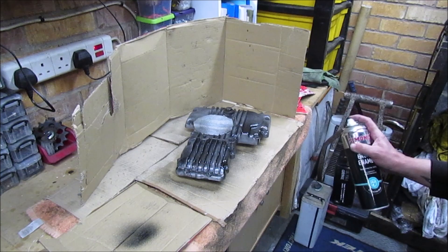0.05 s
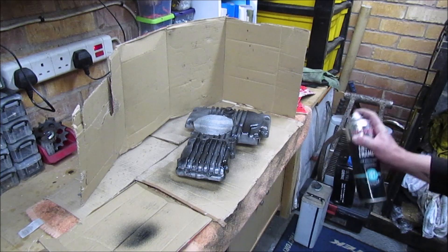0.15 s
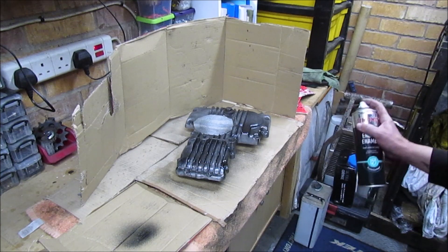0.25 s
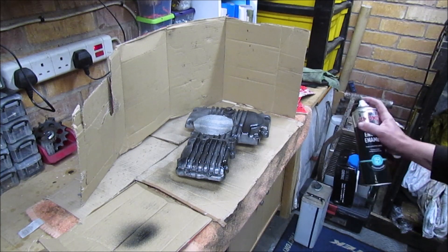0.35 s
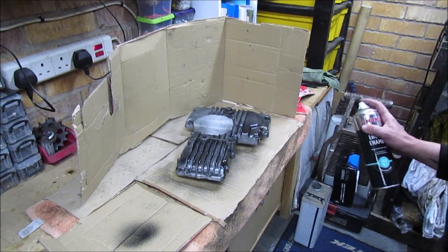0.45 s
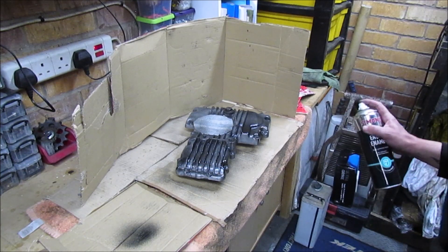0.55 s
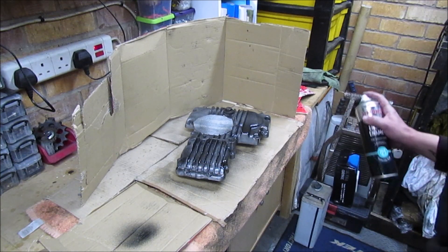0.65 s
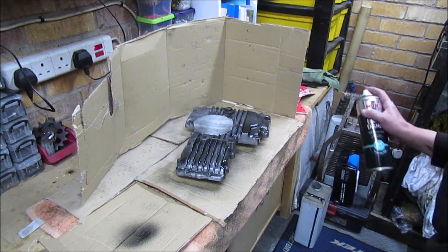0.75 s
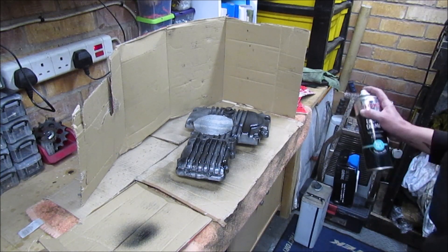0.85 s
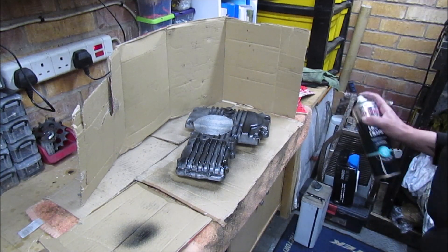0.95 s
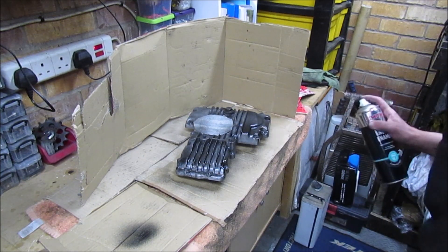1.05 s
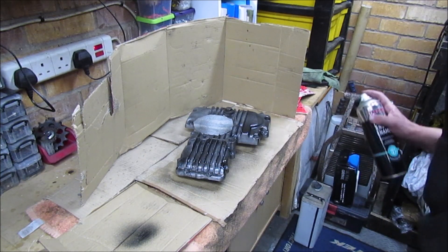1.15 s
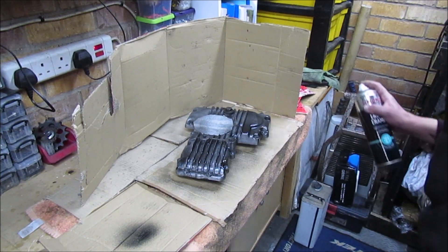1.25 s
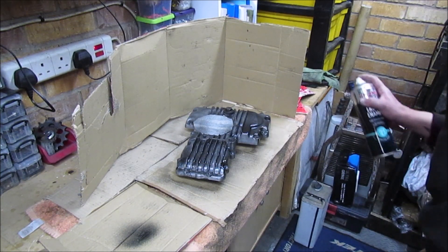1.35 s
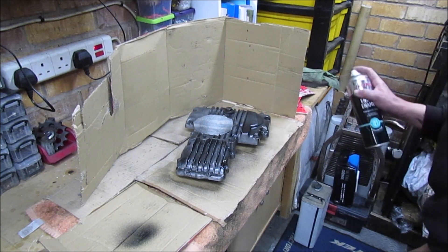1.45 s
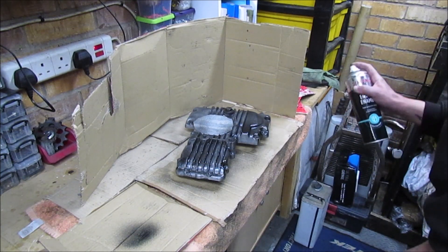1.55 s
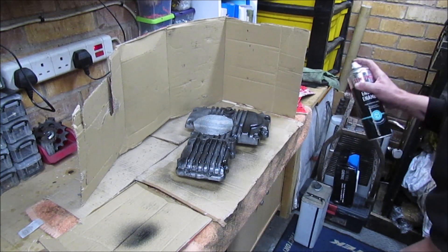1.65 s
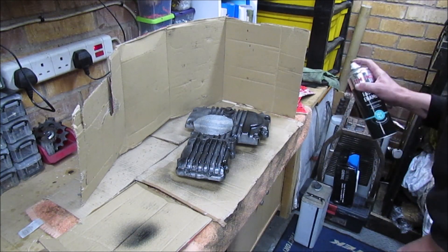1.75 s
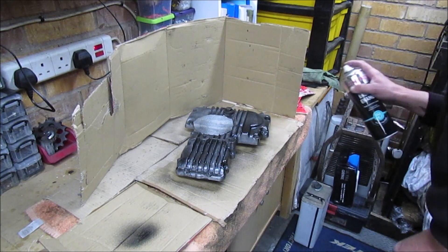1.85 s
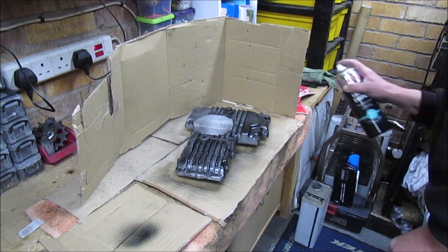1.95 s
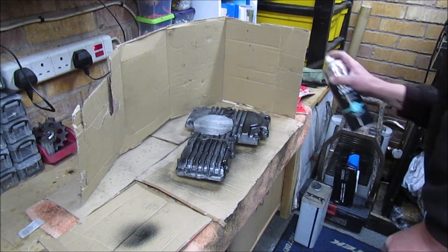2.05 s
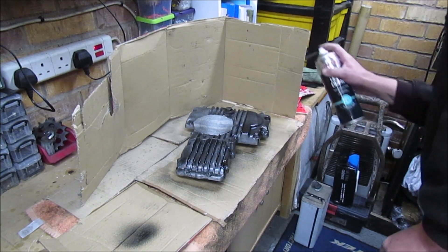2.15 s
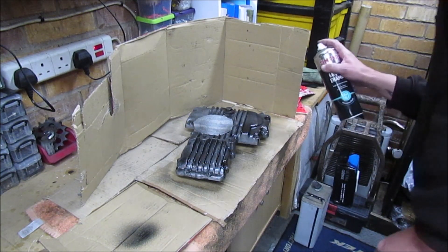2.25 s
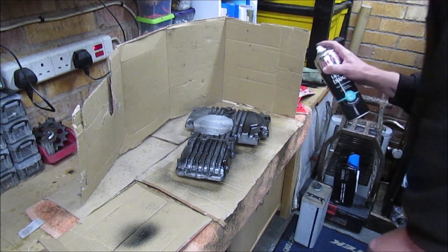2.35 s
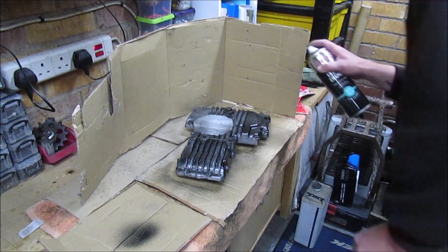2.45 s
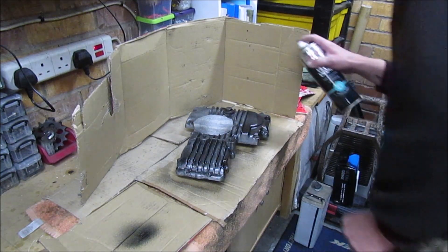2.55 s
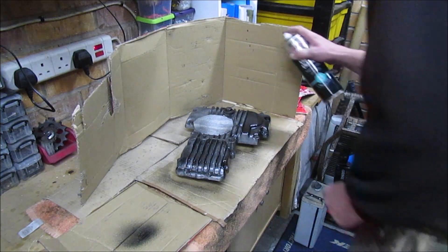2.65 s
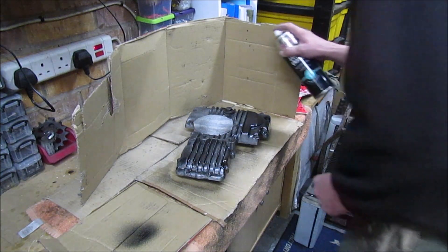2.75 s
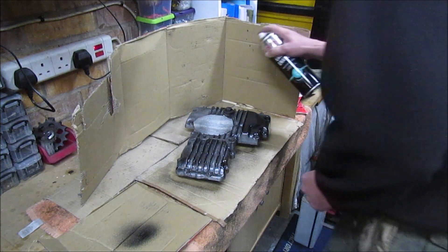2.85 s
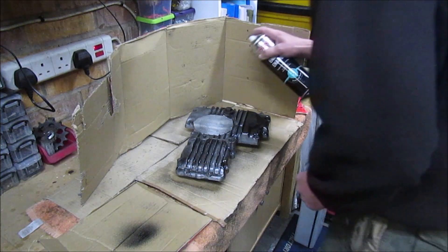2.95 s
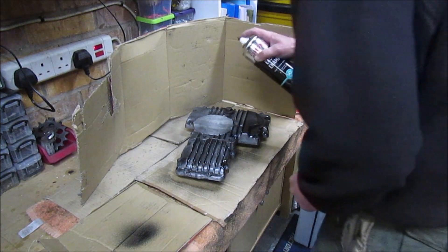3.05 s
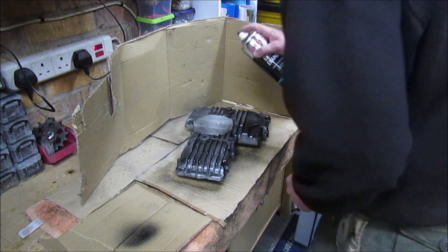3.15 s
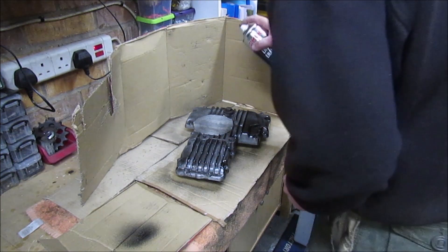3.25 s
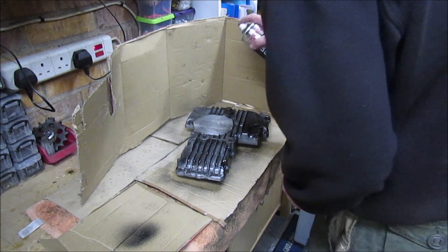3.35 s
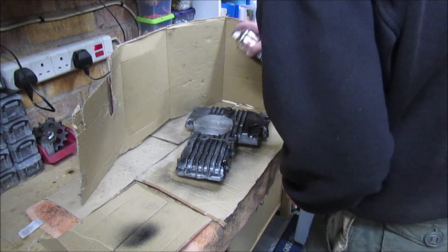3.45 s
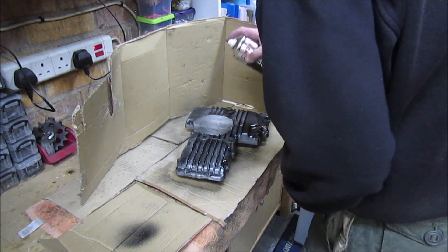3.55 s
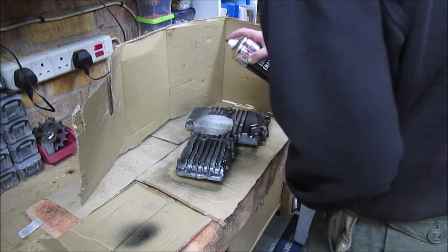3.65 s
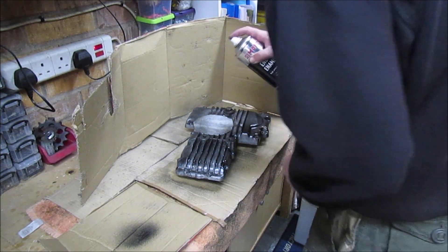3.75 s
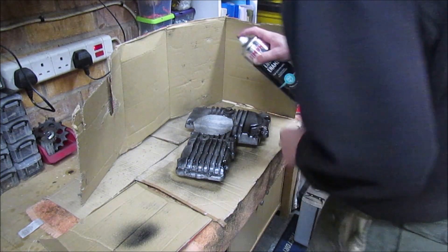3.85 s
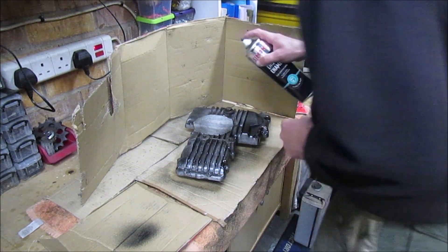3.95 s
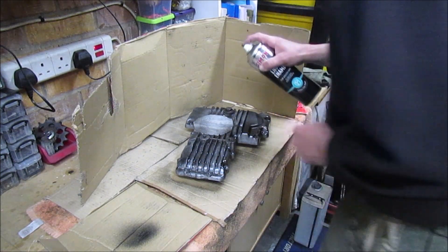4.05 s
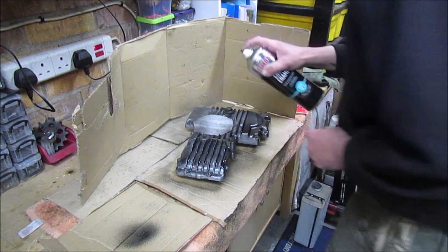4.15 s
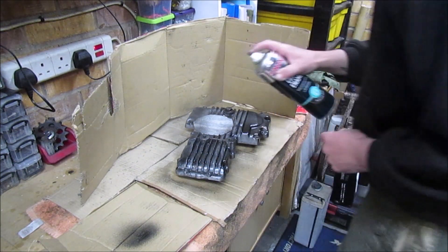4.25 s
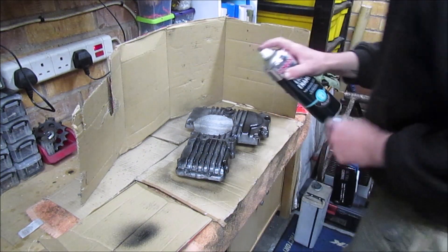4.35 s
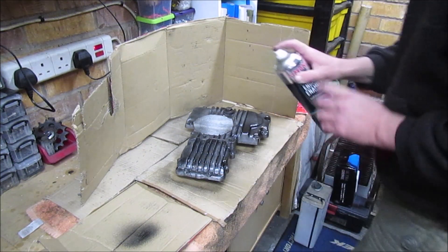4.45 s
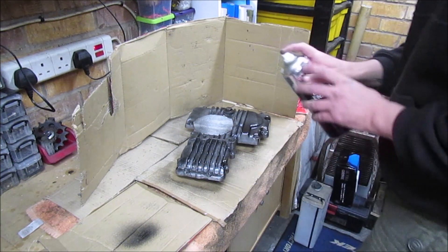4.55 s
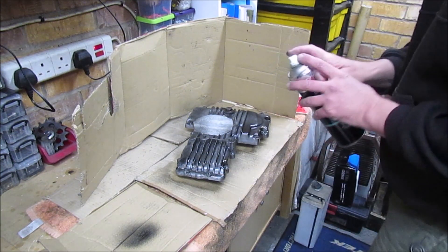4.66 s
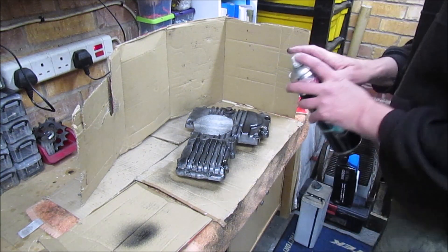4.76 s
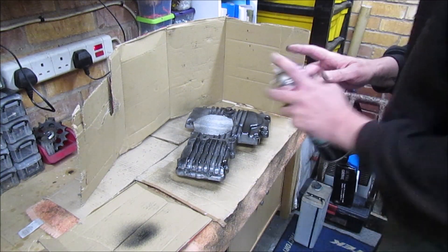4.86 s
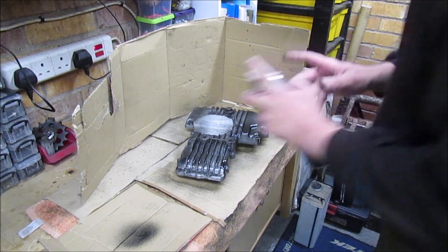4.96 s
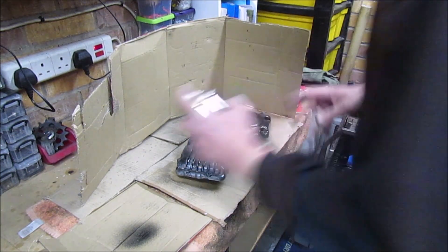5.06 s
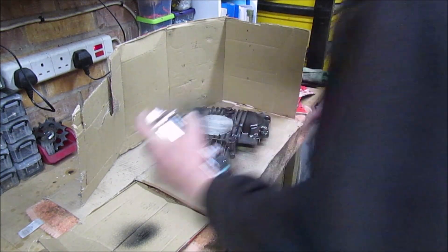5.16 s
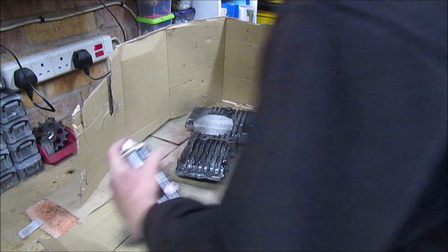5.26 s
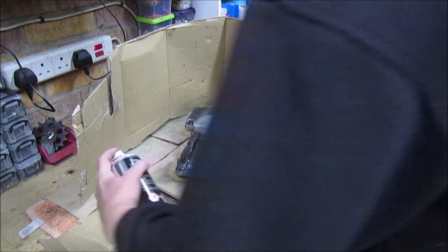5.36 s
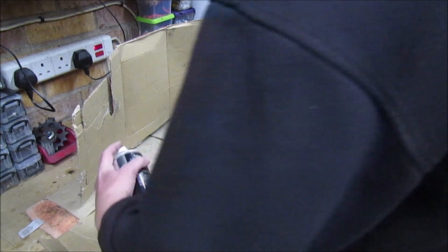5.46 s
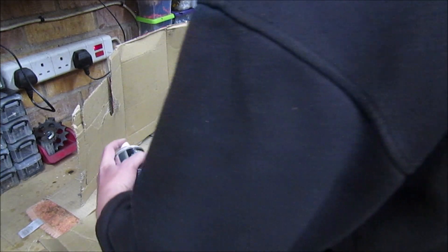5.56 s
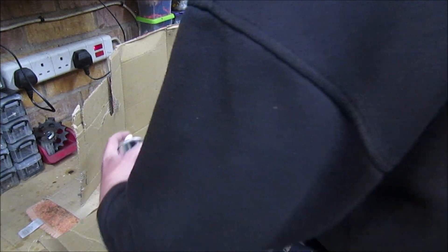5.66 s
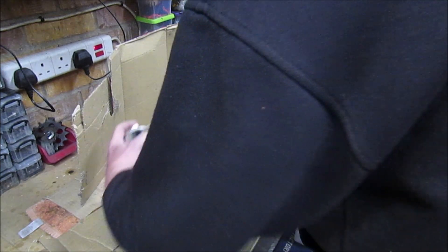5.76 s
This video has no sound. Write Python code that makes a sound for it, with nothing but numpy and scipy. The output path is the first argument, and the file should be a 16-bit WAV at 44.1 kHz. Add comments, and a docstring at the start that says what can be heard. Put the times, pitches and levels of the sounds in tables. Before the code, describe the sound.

A quiet garage workshop, recorded close in stereo, with very faint room air and a barely audible uneven electrical whirr and thin whine. An aerosol can sprays in short, bright hisses, strongest around ten kilohertz, with a much softer breathy rush of mist beneath. The first burst at 0.15 s lasts nearly 0.3 s; the others are about half that, at 0.9, 1.45, 2.1, 2.95, 3.5 and 4.1 s. Each opens with a tiny leak, jumps to full hiss, swells slightly and shuts off fast, with slightly different pitch colour and tight boxy reflections. Faint sleeve brushes come near 2.1 to 2.4 and 4.0 s. Light skin rubbing starts around 3.75 s and becomes busier from 4.3 to 5.2 s, making the thin metal can ring softly, brightest near 5.0 s. Cloth rustles faintly at 5.3 to 5.6 s, then a last, weaker burst at 5.75 s.

```python
"""Spray painting in a garage

Eight short bursts come from an aerosol can aimed at a metal part in a cardboard booth on a bench.
The nozzle hiss and the rush of mist are shaped noise, coloured by echoes off the near walls.
Hands turn the can between the last bursts: rubbing noise sets resonances of its thin wall ringing.
A sleeve brushes past as soft swells of noise; noise, hums and thin tones make the garage background.
"""
import sys
import numpy as np
from scipy import signal
from scipy.fft import rfft, irfft, next_fast_len
from scipy.io import wavfile
from scipy.ndimage import uniform_filter1d

SR = 44100
rng = np.random.default_rng(int(sys.argv[2]) if len(sys.argv) > 2 else 0)


def transcribe(u):
    """Save the signal u as a 16-bit wav file named by the first command-line argument.

    u: samples, shape (n,) or (channels, n), limited to [-1, 1]; the rate is SR.
    q: integer samples, one column per channel.
    """
    v = np.clip(np.atleast_2d(u).T, -1, 1)
    q = np.round(v * 32767).astype(np.int16)
    wavfile.write(sys.argv[1], SR, q)


N = 256220
TIME = np.arange(N) / SR   # seconds
CUTOFF_HZ = 15950   # the sound ends near this frequency

# Presses of the spray valve. Each row: start in seconds, time held in seconds, opening time in seconds,
# hardest push in seconds after the start, its extra level in dB, hiss level in dB before trim,
# mist level in dB before trim, two pitches in Hz that stand out of the hiss, their strength in dB.
PRESSES = [ (0.157, 0.28, 0.017, 0.17, .7, -31.5, -56, 9540, 12150, -9),
           (0.911, 0.15, 0.0054, 0.092, 0.5, -32.5, -58.5, 7750, 9900, -8),
           (1.451, 0.14, 0.003, 0.089, 0.5, -32, -57.5, 8000, 9370, -5),
           (2.098, 0.15, 0.0091, 0.093, 2.5, -33, -56, 10300, 15200, -17),
           (2.958, 0.15, 0.0035, 0.12, 3, -31, -56, 7400, 10300, -6),
           (3.475, 0.15, 0.0043, 0.11, 2.2, -32.5, -58, 6400, 13000, 1),
           (4.128, 0.15, .004, 0.1, 1, -31, -54.5, 7900, 15000, -18),
           (5.734, 0.12, .007, 0.081, 1, -36.5, -55, 5750, 13100, -3), ]
# Colour of the nozzle hiss. Each row: frequency in Hz, relative level in dB per Hz.
HISS_SPECTRUM = [(150, -59), (1200, -29), (3200, -16), (4500, -12.5), (5700, -9), (7200, -2), (8500, -1),
                 (10000, 2.5), (11500, 1), (13500, -1.5), (15500, -4.5)]
# Colour of the rushing mist. Each row: frequency in Hz, relative level in dB per Hz.
MIST_SPECTRUM = [(50, -44), (110, -39), (200, -6.5), (400, -2), (800, -1.5), (1400, 1), (2400, -1),
                 (3500, -4.5), (6000, -15)]
# Echoes off bench and booth. Each row: average delay in seconds, strength in dB.
BOOTH_ECHOES = [(.00072, -22), (.0016, -7), (.0029, -5.5), (.0047, -11.5), (.0061, -9.5), (.0078, -14),
                (.0108, -8.5), (0.0156, -9.5)]
CRACK_S, CRACK_DB = 0.0059, -16   # the valve first leaks this long and this quietly, then opens
FIRMEST_SHARE = 0.49   # the flow is strongest at this share of the hold
EASE_DB_PER_S2 = 250   # dB lost per squared second away from that moment
CLOSING_S = 0.0067   # softness of the closing valve
HISS_FALL_DB_PER_S, MIST_FALL_DB_PER_S = 414, 230   # dying away after the release
MIST_BUILD_S = 0.0069   # the mist takes this much longer to build up than the hiss
MIST_EARLY_S = 0.013   # and starts to fade this much earlier
PUSH_S = 0.016   # half length of the swell under the hardest push

# Strokes of the hands on the can. Each row: middle in seconds, half length in seconds, then levels
# in dB before trim of skin friction, bright wall ring and hollow wall ring.
STROKES = [ (3.747, 0.067, -67.5, -68.5, -70.5), (3.930, .045, -84, -88, -82),
           (4.075, 0.067, -64.5, -62.5, -70.5), (4.333, 0.046, -62, -67, -65.5),
           (4.41, 0.044, -65, -68, -68.5), (4.560, 0.047, -60.5, -58.5, -76),
           (4.657, 0.073, -60, -59.5, -70), (4.879, 0.061, -62.5, -62.5, -64),
           (4.987, 0.036, -60, -54.5, -69), (5.057, 0.028, -68.5, -65.5, -81),
           (5.154, 0.071, -72.5, -73.5, -79), (5.235, 0.028, -76, -78, -76.5), ]
STROKE_SHAPE = 1.58   # exponent of a stroke's swell: 1 is pointed, 2 a bell
# Colour of skin rubbing on the can. Each row: frequency in Hz, relative level in dB per Hz.
SKIN_SPECTRUM = [(70, -32), (400, -12), (900, -1.5), (2000, 2.5), (3600, 6), (7000, 5), (10500, 5),
                 (13000, -2), (15500, -11)]
# Can wall resonances of the bright family. Each row: frequency in Hz, width in Hz, relative level in dB.
BRIGHT_MODES = [(4713, 114, 3.5), (7520, 220, -8), (9540, 290, -3), (10850, 550, -3.5)]
# Can wall resonances of the hollow family. Each row: frequency in Hz, width in Hz, relative level in dB.
HOLLOW_MODES = [(1650, 290, -10.5), (2110, 170, -11), (2957, 240, -4), (7830, 290, -1.5), (9470, 240, -1.5)]

# Sleeve brushing the body. Each row: middle in seconds, half length in seconds, level in dB.
BRUSHES = [(2.101, .03, -65), (2.295, 0.037, -63.5), (2.41, 0.1, -68), (3.989, 0.025, -61),
           (4.05, 0.093, -78), (5.324, 0.042, -65.5), (5.573, 0.031, -61), (5.646, 0.042, -67.5)]
# Colour of the brushing cloth. Each row: frequency in Hz, relative level in dB per Hz.
CLOTH_SPECTRUM = [(60, -30), (200, -0.5), (600, 9), (1500, 3.5), (3000, -1.5), (7000, -6.5), (15000, -17)]

# Colour of the steady garage air. Each row: frequency in Hz, relative level in dB per Hz.
AIR_SPECTRUM = [(30, -24), (70, -18), (140, -11.5), (250, -5), (450, 0), (700, -4.5), (1200, -9),
                (2700, -17), (5000, -17.5), (9000, -14.5), (15000, -17.5)]
# Broad hums of small electrics. Each row: frequency in Hz, width in Hz, level in dB before flutter.
HUMS = [(505, 160, -76), (1630, 150, -83), (1915, 217, -73.5), (3720, 350, -81), (5870, 270, -83.5),
        (7720, 160, -85)]
# Thin steady tones of small electrics. Each row: frequency in Hz, level in dB.
TONES = [(398.4, -84.5), (15735, -87)]

# Stereo width of the spray. Each row: frequency in Hz, side level relative to the middle in dB.
SPRAY_WIDTH = [(300, -47), (3100, -81), (6300, -33), (8000, -9.5), (10500, -9), (15000, -3)]
# Stereo width of skin and cloth. Each row: frequency in Hz, side level relative to the middle in dB.
RUBBED_WIDTH = [(300, -28), (700, -7), (1400, -0.5), (3100, -20), (7000, -17.5), (15000, 0)]
# Stereo width of the air. Each row: frequency in Hz, side level relative to the middle in dB.
AIR_WIDTH = [(60, -15), (290, -24.5), (480, -15), (750, -3.5), (1200, 4.5), (1900, 4.5), (3000, 0.5),
             (5000, -17), (7500, -3), (15000, -2)]


def spray(hiss_db, mist_db, sputter_db, surge_db, pitch_width_hz):
    """Each press lets out a jet and mist, which sputter finely as paint breaks into droplets."""
    jet = booth(noise(HISS_SPECTRUM, SPRAY_WIDTH), sway=0.03067)
    hiss = np.zeros((2, N))
    mist_gain = np.zeros(N)
    for start, held, opening, push_after, push_db, press_hiss_db, press_mist_db, *pitches, pitch_db in PRESSES:
        push_swell_db = push_db * np.exp(-((TIME - start - push_after) / PUSH_S) ** 2)
        whistle = sum(resonate(jet, hz, pitch_width_hz) for hz in pitches)
        coloured = jet + from_db(pitch_db) * whistle
        coloured = coloured / np.std(coloured.mean(axis=0))
        hiss_valve = valve(start, held, opening, HISS_FALL_DB_PER_S)
        hiss += from_db(press_hiss_db + push_swell_db) * hiss_valve * coloured
        mist_valve = valve(start, held - MIST_EARLY_S, opening + MIST_BUILD_S, MIST_FALL_DB_PER_S)
        mist_gain += from_db(press_mist_db + push_swell_db) * mist_valve
    mist = mist_gain * booth(noise(MIST_SPECTRUM, SPRAY_WIDTH), sway=0.1)
    flow = from_db(sputter_db * drift(350) + surge_db * drift(30))
    return flow * (from_db(hiss_db) * hiss + from_db(mist_db) * mist)


def valve(start, held, opening, fall_db_per_s):
    """Gain of one press: a brief leak, the opening, an arch of finger pressure, the release."""
    t = np.maximum(TIME - start, 0)
    leak = from_db(CRACK_DB) * (t > 0)
    opened = 1 - np.exp(-np.maximum(t - CRACK_S, 0) / opening)
    arch_db = EASE_DB_PER_S2 * (t - FIRMEST_SHARE * held) ** 2
    # time since the release, with a rounded corner so that the valve shuts softly
    released_s = CLOSING_S * np.logaddexp(0, (t - held) / CLOSING_S)
    loss_db = np.minimum(arch_db + fall_db_per_s * released_s, 200)
    return (leak + (1 - leak) * opened) * from_db(-loss_db)


def booth(x, sway):
    """Near echoes add to the sound and comb its colour; their paths change as the arm moves the can."""
    out = x
    for delay, db in BOOTH_ECHOES:
        moving_delay = delay * (1 + sway * drift(0.2024))
        out = out + from_db(db) * delayed(x, moving_delay)
    return out / np.std(out.mean(axis=0))


def handling(skin_db, bright_db, hollow_db, grip_db, waver_s):
    """Skin catches and slips on the can and sets its thin wall ringing."""
    friction = noise(SKIN_SPECTRUM, RUBBED_WIDTH) * from_db(grip_db * drift(90))
    skin_gain, bright_gain, hollow_gain = strokes()
    skin = from_db(skin_db) * skin_gain * booth(friction, sway=0.0562)
    bright = from_db(bright_db) * bright_gain * wall(friction, BRIGHT_MODES, waver_s)
    hollow = from_db(hollow_db) * hollow_gain * wall(friction, HOLLOW_MODES, waver_s)
    return skin + bright + hollow


def strokes():
    """Gains over time of skin friction, bright ring and hollow ring: each stroke swells and fades."""
    gains = np.zeros((3, N))
    for middle, half_length, *levels in STROKES:
        swell = np.exp(-np.abs((TIME - middle) / half_length) ** STROKE_SHAPE)
        gains += np.outer(from_db(levels), swell)
    return gains


def wall(friction, modes, waver_s):
    """Rubbing keeps a family of wall resonances ringing; their pitch wavers as the grip shifts."""
    ring = np.zeros((2, N))
    for hz, width, db in modes:
        mode = resonate(resonate(friction, hz, width), hz, width)
        ring += from_db(db) * mode / np.sqrt(width)   # narrow modes let less noise through
    ring = delayed(ring, waver_s * drift(1.51))   # a changing delay bends the pitch
    # even out the loudness, so that the strokes alone set it
    power = uniform_filter1d(np.mean(ring ** 2, axis=0), size=1500)
    return ring / np.sqrt(power + 1e-18)


def sleeve(grain_db):
    """Cloth brushing past: soft swells of grainy noise."""
    swell = sum(from_db(db) * np.exp(-((TIME - s) / half_length) ** 2) for s, half_length, db in BRUSHES)
    return swell * noise(CLOTH_SPECTRUM, RUBBED_WIDTH) * from_db(grain_db * drift(140))


def background(air_db, flutter_db):
    """Still garage air, with the faint uneven whirr and steady whine of small electrics."""
    air = noise(AIR_SPECTRUM, AIR_WIDTH)
    whirr = np.zeros(N)
    for hz, width, db in HUMS:
        once = resonate(rng.standard_normal(N), hz, 2 * width)
        whirr += from_db(db) * rms_one(resonate(once, hz, 2 * width))
    # the root of 2 gives each sine an rms of 1
    whine = sum(from_db(db) * np.sqrt(2) * np.sin(2 * np.pi * hz * TIME) for hz, db in TONES)
    return from_db(air_db) * air + from_db(flutter_db * drift(4.3)) * whirr + whine


def noise(spectrum, side_spectrum):
    """Steady stereo noise with a given colour and width; its middle has rms 1."""
    size = next_fast_len(N)
    hz = np.arange(size // 2 + 1) * SR / size
    colour = from_db(at_hz(spectrum, hz)) * (hz < CUTOFF_HZ + 300)
    white = rfft(rng.standard_normal((2, size)))
    mid = irfft(white[0] * colour, size)[:N]
    side = irfft(white[1] * colour * from_db(at_hz(side_spectrum, hz)), size)[:N]
    return np.array([mid + side, mid - side]) / np.std(mid)


def resonate(x, hz, width):
    """A resonance that lets its own pitch through at a gain of about 1 and weakens the rest."""
    r = np.exp(-np.pi * width / SR)
    top = np.array([1, 0, -1]) * (1 - r * r) / 2
    return signal.lfilter(top, [1, -2 * r * np.cos(2 * np.pi * hz / SR), r * r], x)


def delayed(x, seconds):
    """Read a stereo sound through a delay that changes with time."""
    fine = signal.resample_poly(x, 2, 1, axis=1)   # doubled rate, for cleaner reading between samples
    place = 2 * SR * (TIME - seconds)
    return np.array([np.interp(place, np.arange(2 * N), side, left=0) for side in fine])


def drift(rate):
    """Random wandering of rms 1, smoothed above about rate in Hz."""
    step = 40   # samples per drawn value, joined by straight lines
    r = np.exp(-2 * np.pi * rate * step / SR)
    draws = rng.standard_normal(N // step + 2002)
    slow = signal.lfilter([1], [1, -2 * r, r * r], draws)[2000:]   # skip the filter's start
    return np.interp(np.arange(N) / step, np.arange(len(slow)), rms_one(slow))


def at_hz(points, hz):
    """Read a spectrum on a log-frequency axis."""
    points = np.array(points)
    return np.interp(np.log(hz + 1), np.log(points[:, 0]), points[:, 1])


def from_db(db):
    """Gain of a level in dB."""
    return 10 ** (np.asarray(db) / 20)


def rms_one(x):
    """Scale to unit power."""
    return x / np.sqrt(np.mean(x ** 2) + 1e-20)


def scene():
    """Spray, hands and sleeve over the quiet of the garage."""
    paint = spray(hiss_db=0.5, mist_db=1.47, sputter_db=0.68, surge_db=0.5, pitch_width_hz=150)
    hands = handling(skin_db=5.5, bright_db=2.5, hollow_db=8, grip_db=0.4, waver_s=0.00015)
    return paint + hands + sleeve(grain_db=0.5) + background(air_db=-69.0, flutter_db=1.25)


def record(dry):
    """The left side is a little brighter than the right; the top is cut steeply."""
    heard = dry + 0.045 * resonate(dry, 13500, 5000) * [[1], [-1]]
    steep_cut = signal.ellip(12, 0.2, 70, CUTOFF_HZ - 100, fs=SR, output="sos")
    return signal.sosfilt(steep_cut, heard)


dry = scene()
out = record(dry)
transcribe(out)
```